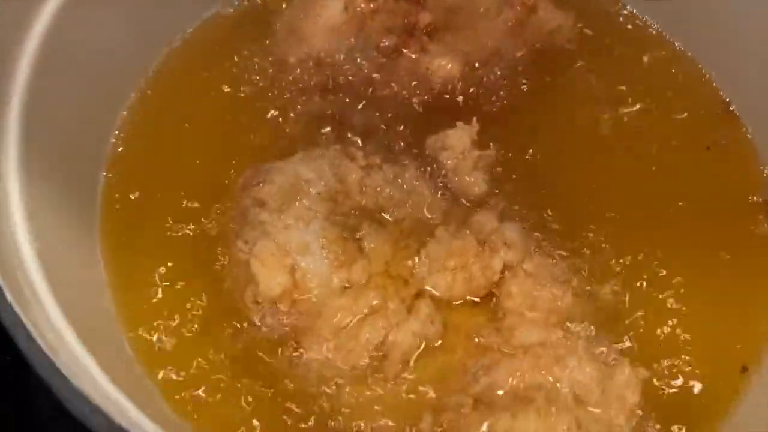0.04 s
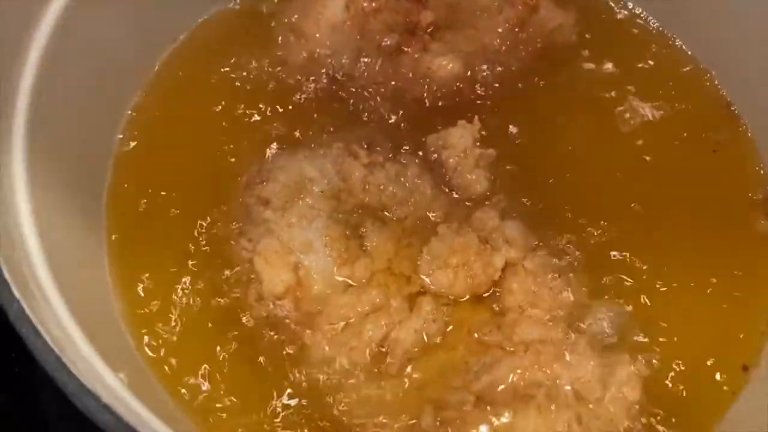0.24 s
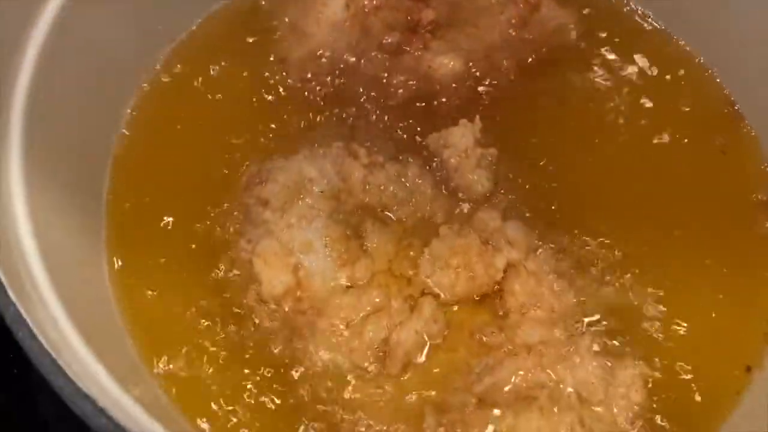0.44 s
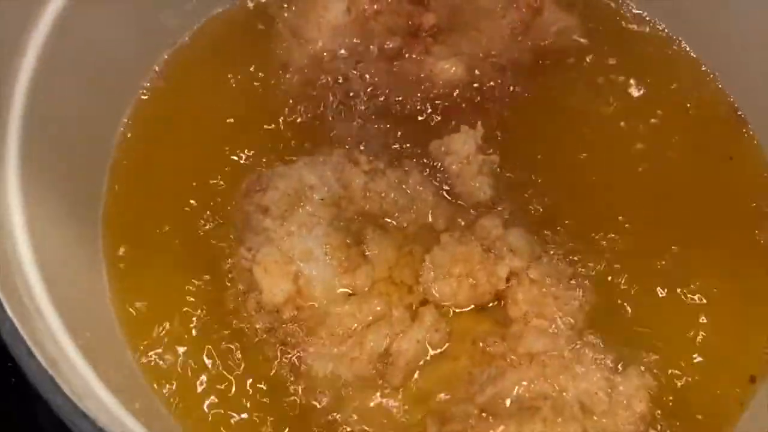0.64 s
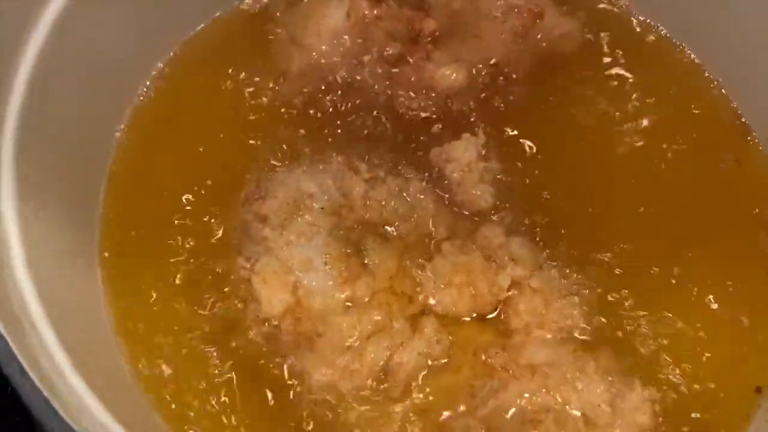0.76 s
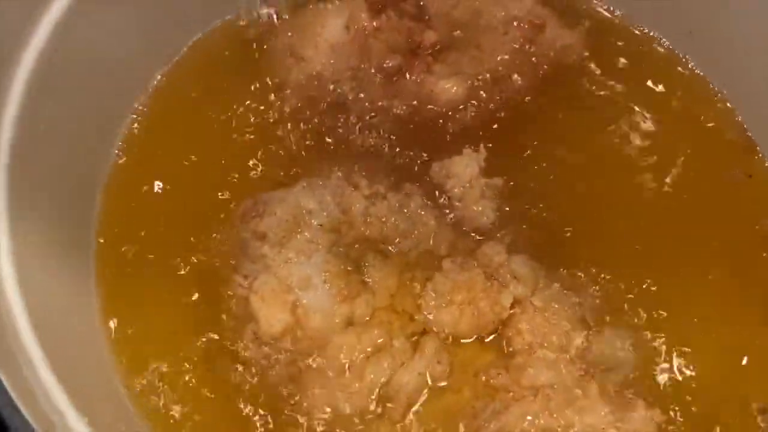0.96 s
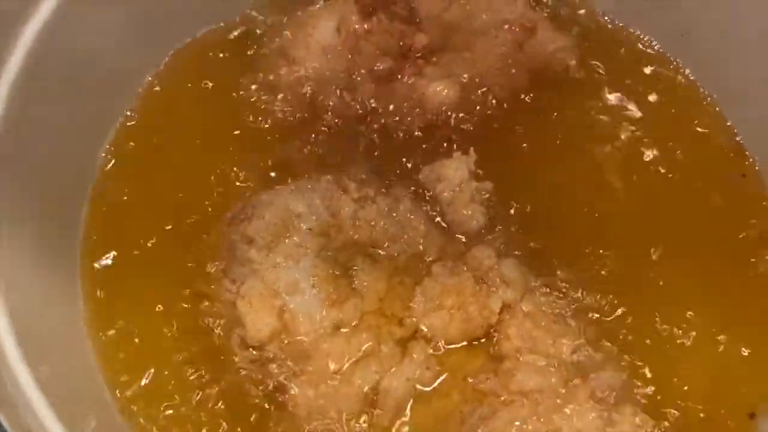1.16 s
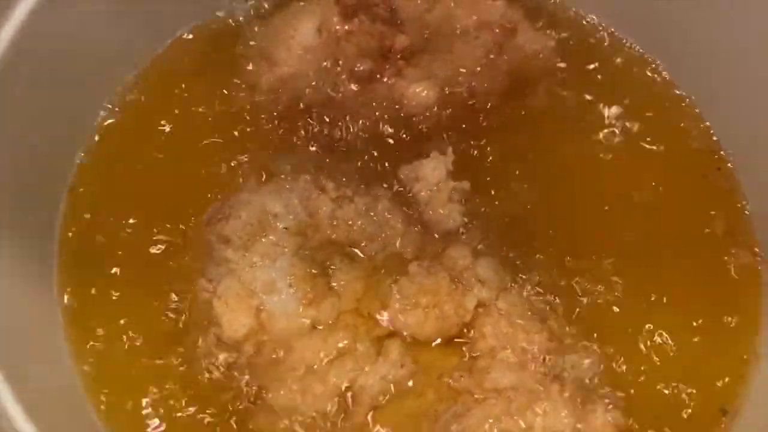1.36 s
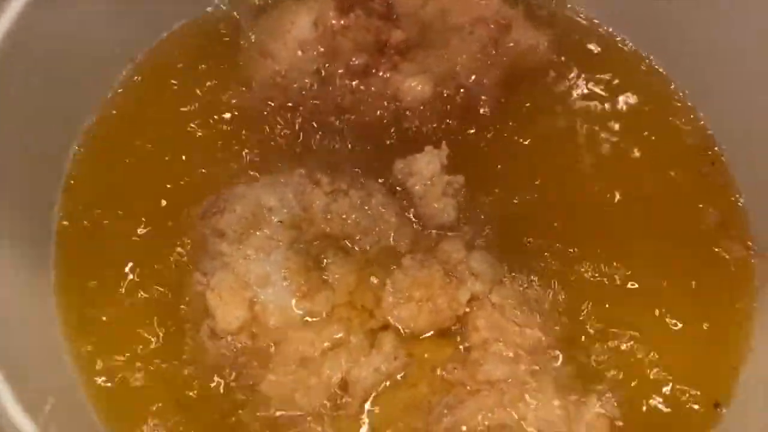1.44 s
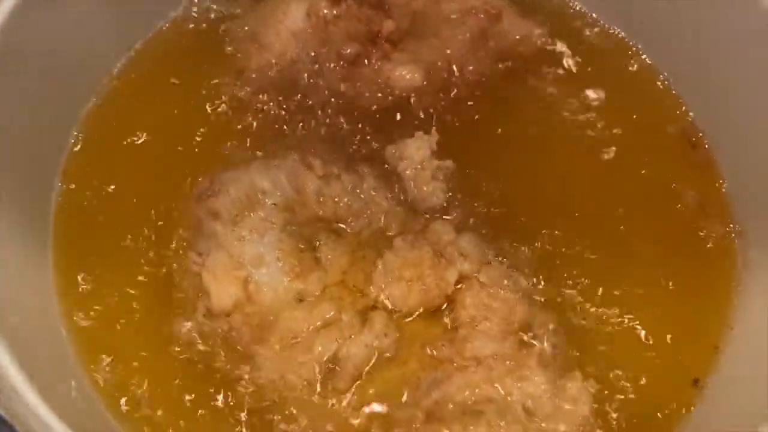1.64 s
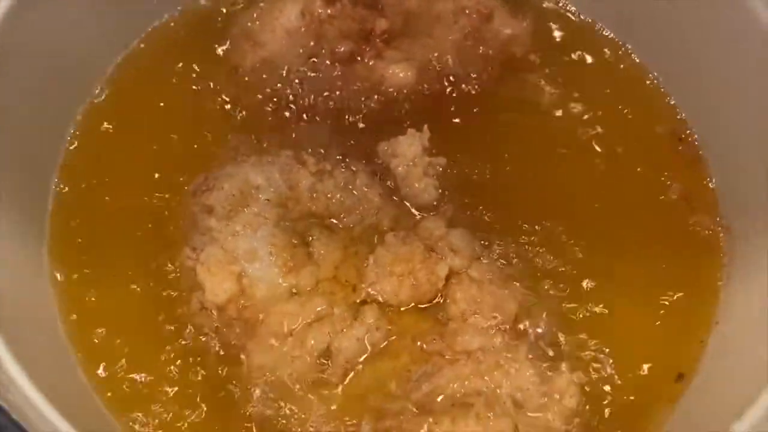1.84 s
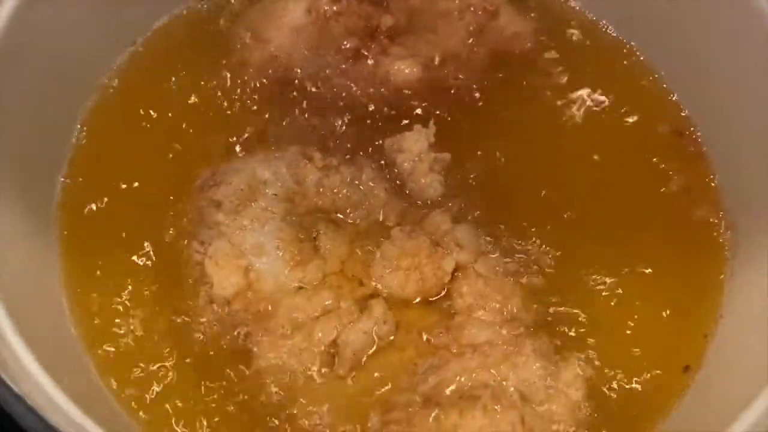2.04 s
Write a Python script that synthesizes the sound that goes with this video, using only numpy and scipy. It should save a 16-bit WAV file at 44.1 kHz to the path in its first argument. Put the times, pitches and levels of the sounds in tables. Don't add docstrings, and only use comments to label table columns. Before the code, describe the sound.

Close, crisp frying sizzle runs unbroken from start to end, flickering slightly, with scattered ringing bubble pops and short oil spits, over the soft low drone of a kitchen fan, picked up by a handheld phone.

```python
import sys
import numpy as np
from scipy import signal
from scipy.fft import rfft, irfft, next_fast_len
from scipy.io import wavfile
from scipy.ndimage import uniform_filter1d, map_coordinates

SR = 44100
rng = np.random.default_rng(int(sys.argv[2]) if len(sys.argv) > 2 else 0)


def invert_db(x):
    u = np.asarray(x, float) / 20
    return 10 ** u


def put_to_file(sound):
    columns = np.atleast_2d(sound).T
    safe = np.clip(columns, -1, 1)
    whole_steps = np.round(safe * 32767)
    wavfile.write(sys.argv[1], SR, whole_steps.astype(np.int16))


N = 92345


def unit(x):
    return x / np.sqrt(np.mean(x ** 2) + 1e-20)


def along(points, hz):
    point_hz, value = np.transpose(points)
    return np.interp(np.log(hz + 1), np.log(point_hz + 1), value)


def curve(rows):
    time_s, value = np.transpose(rows)
    return np.interp(np.arange(N) / SR, time_s, value)


def wobble(rate):
    knots = rng.standard_normal(N // 20)[:int(N * rate / SR) + 4]
    return map_coordinates(knots, [np.arange(N) * rate / SR])


def filtered(x, response):
    size = next_fast_len(N + 8192)
    return irfft(rfft(x, size) * response(np.fft.rfftfreq(size, 1 / SR)), size)[..., :N]


def ports(pair, alike, lead):
    # hz, level_db
    balance = [(200, -.5), (900, 1), (2000, 0), (4500, 3), (6000, 3), (8000, 0), (10000, -0.5)]
    sign = np.array([[1], [-1]])

    def shares(hz):
        angle = np.arccos(np.clip(along(alike, hz), -1, 1)) / 2
        return np.array([np.cos(angle), np.sin(angle)])

    def port_response(hz):
        return invert_db(sign * along(balance, hz) / 2) * np.exp(-0.5j * sign * lead(hz))

    mid, side = filtered(pair, shares)
    return filtered(np.array([mid + side, mid - side]), port_response)


def hood_air():
    # hz, level_db (per Hz)
    air_tone = [(15, -50), (25, -64), (46, -5), (123, -5.5), (200, -14.5), (291, -9.5), (384, -20.5),
                (508, -20), (700, -35.5), (910, -77), (1540, -120)]
    noise = rng.standard_normal((2, N))
    air = filtered(noise, lambda hz: invert_db(along(air_tone, hz)) / (1 + (hz / 1500) ** 2))
    return invert_db(-24.5) * unit(air)


def hood_duct():
    # pitch_hz, width_hz, level_db
    resonances = [(83.8, 28, -6.5), (148, 63, -10.5), (289.2, 21.7, -10.5), (506.5, 21, -17),
                  (900, 235, -15.5), (1217, 124, -16.5)]

    def ringing(hz):
        total = 0
        for pitch, width, db in resonances:
            peak = 1j * hz * width / (pitch * pitch - hz * hz + 1j * hz * width)
            total = total + invert_db(db) * peak ** 2
        return total

    return invert_db(-28.5) * unit(filtered(rng.standard_normal((2, N)), ringing))


def hood_motor():
    # time_s, level_db
    swell_points = [(0.0, -25.5), (0.12, -43), (0.14, -17), (0.19, -26.5), (0.36, -20.5), (0.42, -22),
                    (0.5, -27), (0.71, -17.5), (0.8, -54), (0.83, -25), (0.94, -16.5), (1.02, -32),
                    (1.09, -25), (1.59, -25.5), (1.61, -14.5), (1.66, -34), (2.01, -22), (2.09, -42)]
    pitch_hz, width_hz, hum_db, swing = 121, 11, -30.5, 1.16
    level_db = curve(swell_points)
    hum = filtered(rng.standard_normal((2, N)), lambda hz: np.exp(-((hz - pitch_hz) / width_hz) ** 2))
    steady = unit(hum / (abs(signal.hilbert(hum)) + 0.4 * hum.std()))
    return invert_db(hum_db + swing * (level_db - level_db.mean())) * steady


def hood():
    # hz, likeness (left-right, 1 = the same)
    likeness = [(100, 1), (350, 0.91), (690, 0.086), (1200, 0.86), (1750, .05)]
    # hz, lead_rad (how far the right port leads)
    right_lead = [(300, 0.08), (700, -0.26), (1300, -0.54), (2000, 0.65)]
    both = hood_air() + hood_duct() + hood_motor()
    return ports(both, likeness, lambda hz: along(right_lead, hz))


def bubbles(start_s, hz, cycles, size, rise):
    t = np.arange(400) / SR
    age = t * (hz / cycles)[:, None]
    fade_out = np.clip(2 - t / t[-1] * 2, 0, 1)
    shape = size[:, None] * np.exp(-3 * age) * (1 - np.exp(-12 * age)) * fade_out
    turn = 2 * np.pi * hz[:, None] * t * (1 + rise * np.minimum(age, 1))
    at = ((start_s * SR).astype(int)[:, None] + np.arange(len(t))).ravel()
    chance_phase = rng.uniform(0, 2 * np.pi, (len(start_s), 1))
    versions = []
    for phase in (0, chance_phase):
        rings = (shape * np.sin(turn + phase)).ravel()
        versions.append(np.bincount(at, rings, N + 500)[:N])
    return np.array(versions)


def swarm(count, hz, octaves, cycles, spread_db, rise):
    chance = rng.random((count, 2))
    pitch = np.clip(hz * 2 ** (octaves * rng.standard_normal(count)), 1900, 15500)
    size = invert_db(np.minimum(-spread_db * np.log(chance[:, 1] + 1e-9), 13))
    return unit(bubbles(chance[:, 0] * N / SR, pitch, cycles, size, rise))


def oil_hiss():
    # hz, level_db (per Hz)
    hiss_tone = [(600, 0.5), (1500, 2), (2600, -0.5), (4000, -5.5), (6300, -7), (8200, -3.5), (11000, -5.5),
                 (15600, -6)]
    z = signal.stft(rng.standard_normal((2, N)), nperseg=256)[2]
    flicker = uniform_filter1d(rng.standard_normal(z.shape[1:]), size=20, axis=0)
    flicker = uniform_filter1d(flicker, size=2, axis=1)
    less_in_bass = np.clip(np.arange(len(flicker)) / 16, 0, 1)[:, None]
    z = z * invert_db(2.3 * unit(flicker) * less_in_bass)
    hiss = signal.istft(z, nperseg=256)[1][:, :N]
    return unit(filtered(hiss, lambda hz: invert_db(along(hiss_tone, hz))))


def sizzle_bed():
    # time_s, level_db
    boiling = [(0.0, -28), (0.02, -28.5), (0.05, -29), (0.42, -29.5), (0.47, -27.5), (0.63, -29.5),
               (0.67, -28.5), (0.69, -29), (1.1, -27.5), (1.12, -28.5), (1.92, -27.5), (2.09, -28.5)]
    fizz = swarm(count=7000, hz=9000, octaves=0.73, cycles=10.5, spread_db=4.0, rise=0.084)
    crackle = swarm(count=1500, hz=5000, octaves=0.99, cycles=2.64, spread_db=6.0, rise=0.01)
    blips = swarm(count=900, hz=5000, octaves=0.94, cycles=5.8, spread_db=5.5, rise=0.027)
    ticks = swarm(count=520, hz=10330, octaves=0.42, cycles=5.1, spread_db=7, rise=0.02)
    bed = invert_db(4.5) * oil_hiss() + invert_db(-4.5) * fizz
    bed = bed + invert_db(-12) * crackle + invert_db(-18) * blips + invert_db(-6) * ticks
    sputter = invert_db(curve(boiling) + 0.45 * wobble(35.2) + 0.69 * wobble(150))
    return sputter * bed


def loud_pops():
    # start_s, peak_db, pitch_hz
    pop_rows = [(.019, -10, 2780), (.439, -11.5, 2600), (.457, -10, 1980), (0.487, -12, 8300),
                (0.517, -18, 5000), (.549, -7.5, 6600), (.583, -19, 8200), (.654, -13.5, 2700),
                (.675, -5.5, 7640), (.826, -9, 10800), (0.84, -9, 2820), (.854, -3.5, 8300),
                (.887, -16, 6100), (.905, -13, 9000), (0.944, -11, 8400), (.97, -8.5, 4600),
                (1.036, -10.5, 2920), (1.091, -15, 2150), (1.242, -9, 7700), (1.27, -10, 7800),
                (1.311, -13, 5660), (1.415, -15, 9000), (1.427, -1, 9600), (1.432, -10, 3980),
                (1.527, -6.5, 7850), (1.573, -9, 8800), (1.676, -13, 4400), (1.724, -11, 5900),
                (1.763, -7.5, 2700), (2.033, -17, 2080)]
    ring_db, life_s = -7, 0.0042
    start_s, peak_db, pitch_hz = np.transpose(pop_rows)
    cycles = life_s * np.sqrt(pitch_hz * 4000)
    return 2 * bubbles(start_s, pitch_hz, cycles, invert_db(peak_db + ring_db), rise=0.038)


def oil_snaps():
    # start_s, peak_db
    snap_rows = [(.015, -16.5), (.28, -25), (.44, -20), (0.47, -20), (0.504, -11), (.745, -16),
                 (0.922, -19), (1.03, -18), (1.04, -24), (1.0912, -10), (1.104, -29), (1.162, -21),
                 (1.473, -31), (1.511, -21), (1.622, -13), (1.868, -19), (1.914, -20)]
    fade_s = 0.01
    t = np.arange(500) / SR
    snaps = np.zeros((2, N))
    for start_s, peak_db in snap_rows:
        snap = invert_db(peak_db - 60 * t / fade_s) * rng.standard_normal((2, len(t)))
        first = int(start_s * SR)
        snaps[:, first:first + len(t)] += snap + 0.26 * np.roll(snap, 1, axis=1)
    return snaps


def frying():
    # hz, likeness (left-right, 1 = the same)
    likeness = [(1800, 0.042), (2600, 0.36), (4000, 0.57), (5700, 0.14), (6600, 0.74), (8000, 0.93),
                (10000, 0.81), (14000, .8)]

    def right_lead(hz):
        delay_s, in_step_hz = 2.38e-4, 6970
        return np.where(hz > 6000, 2 * np.pi * delay_s * (hz - in_step_hz), -0.1)

    return ports(sizzle_bed() + loud_pops() + oil_snaps(), likeness, right_lead)


def joint_stereo(x):
    sharp_s = np.array(np.array([.505, 1.515]))
    from_hz, weaker_db = 5700, -5.5
    looser_db_per_khz, sway_db = 0.15, 0.8
    hz, t, z = signal.stft([x[0] + x[1], x[0] - x[1]], SR, nperseg=2048)
    band = np.arange(len(hz)) // 16
    power = np.add.reduceat(abs(z) ** 2, np.arange(0, len(hz), 16), axis=1)
    power = np.abs(uniform_filter1d(power, size=2, axis=2))[:, band]
    limit_db = weaker_db + looser_db_per_khz * (hz[:, None] - from_hz) / 1000
    limit_db = limit_db + sway_db * rng.standard_normal(len(t))
    strong = power > invert_db(2 * np.minimum(limit_db, 0)) * power[::-1]
    sharp = np.abs(t[:, None] - sharp_s).min(axis=1) < 0.0117
    keep = strong | (hz < from_hz)[:, None] | sharp
    mid, side = signal.istft(z * keep, SR, nperseg=2048)[1][:, :N] / 2
    return np.array([mid + side, mid - side])


def scene():
    return hood() + frying()


def low_pass(x):
    return signal.sosfilt(signal.butter(12, 17060, fs=SR, output="sos"), x)


def record(dry):
    low_cut_hz, top_hz = 51, 15750
    heard = filtered(dry, lambda hz: (hz < top_hz) * hz ** 2 / (hz ** 2 + low_cut_hz ** 2))
    mix = joint_stereo(heard)
    return low_pass(mix)


dry = scene()
out = record(dry)
put_to_file(out)
```